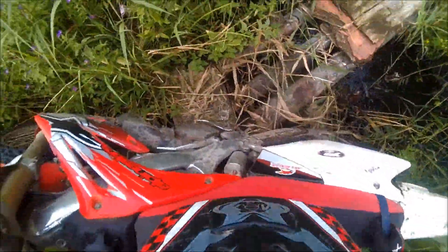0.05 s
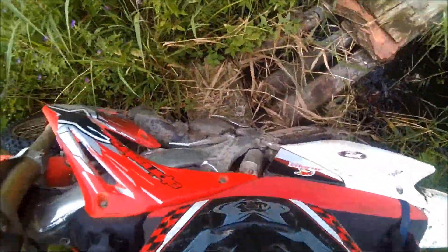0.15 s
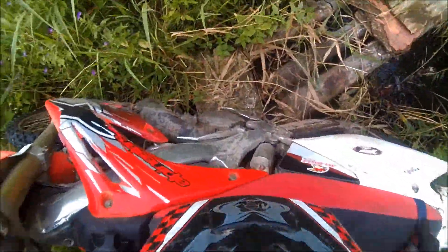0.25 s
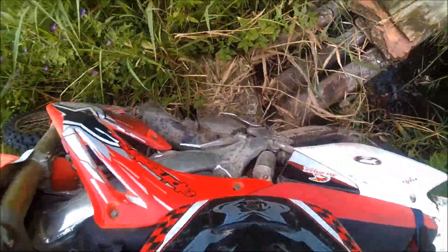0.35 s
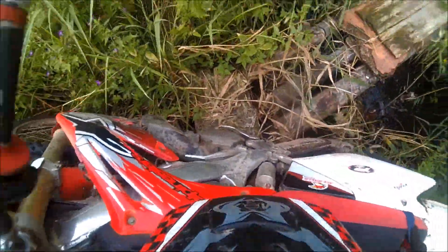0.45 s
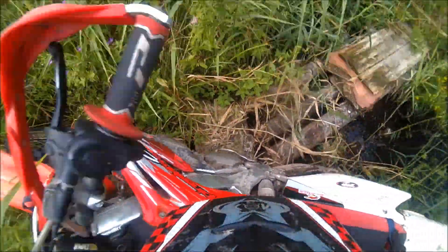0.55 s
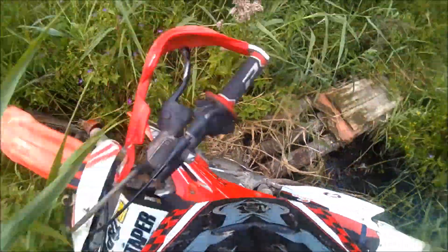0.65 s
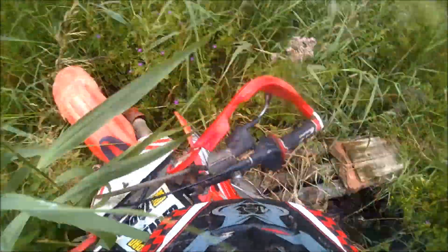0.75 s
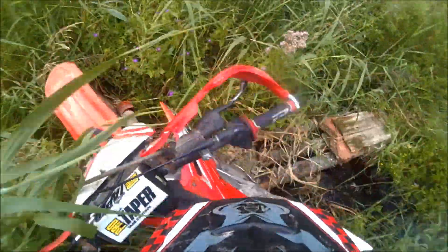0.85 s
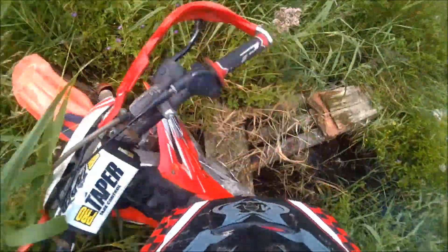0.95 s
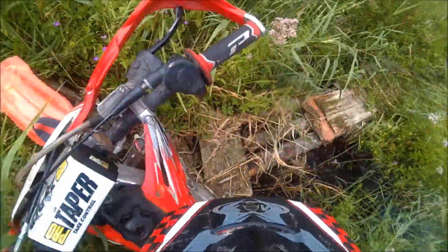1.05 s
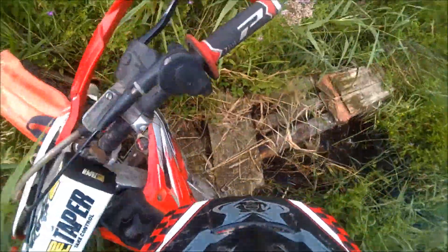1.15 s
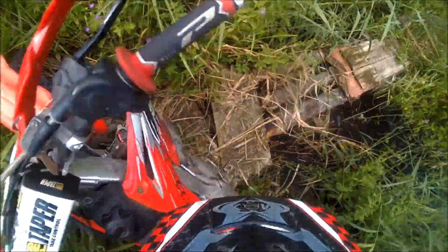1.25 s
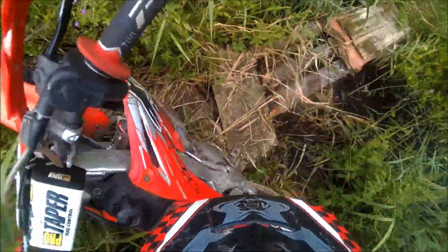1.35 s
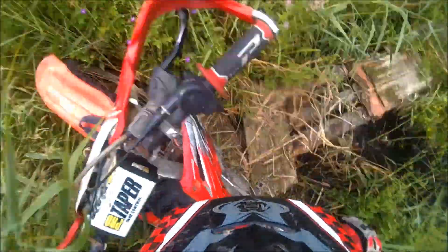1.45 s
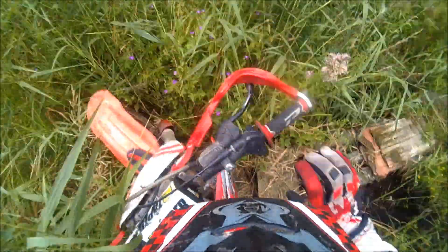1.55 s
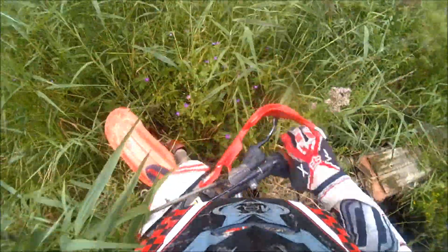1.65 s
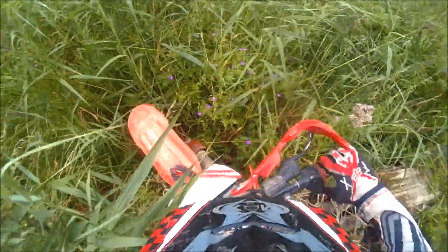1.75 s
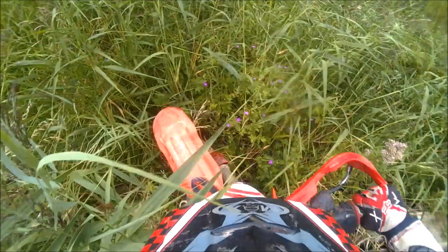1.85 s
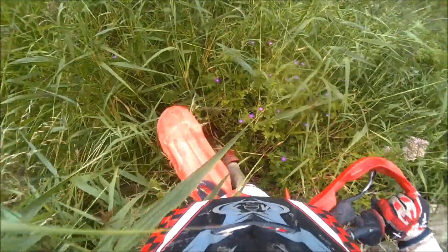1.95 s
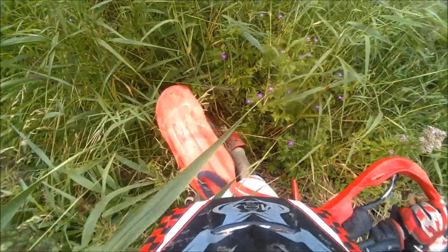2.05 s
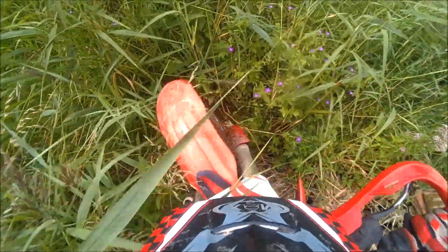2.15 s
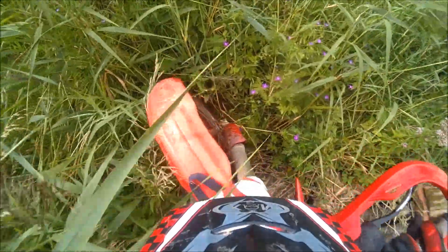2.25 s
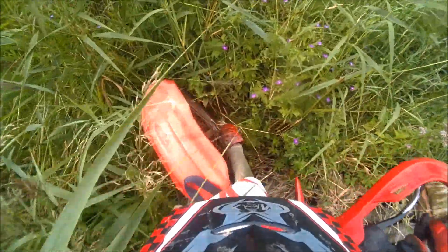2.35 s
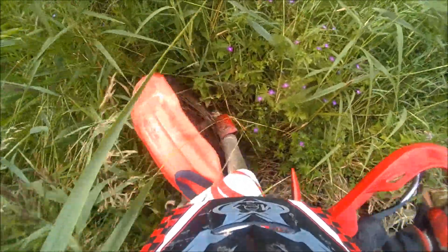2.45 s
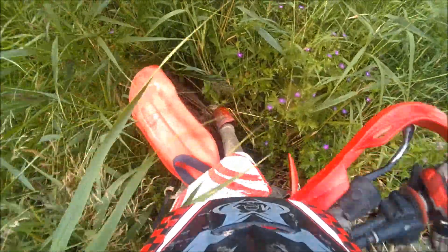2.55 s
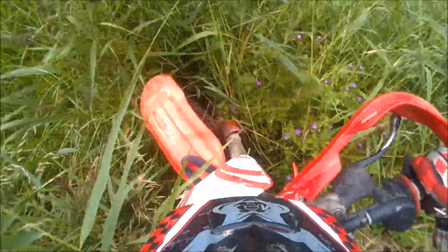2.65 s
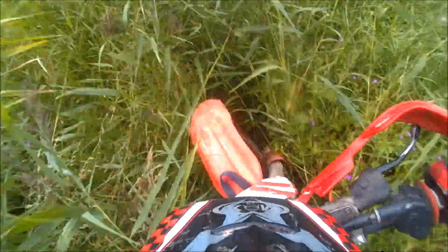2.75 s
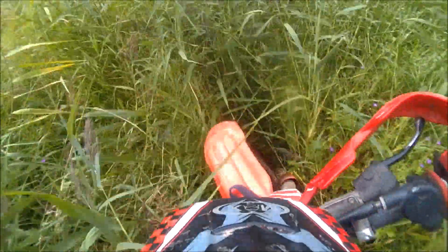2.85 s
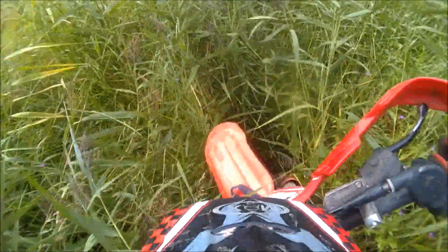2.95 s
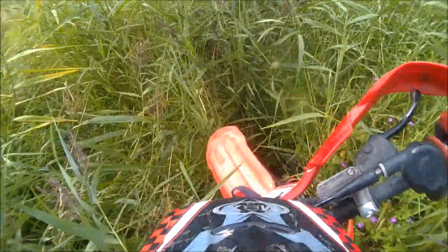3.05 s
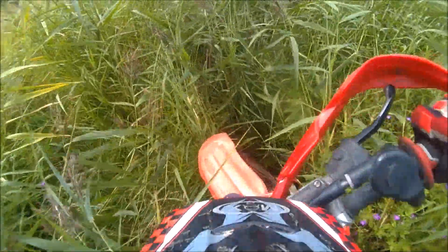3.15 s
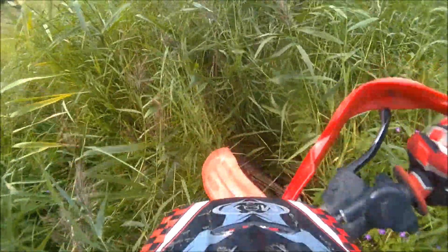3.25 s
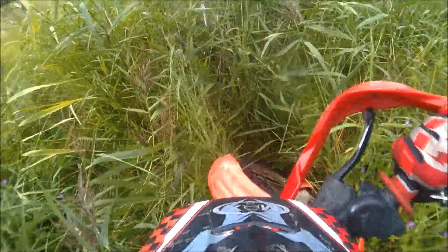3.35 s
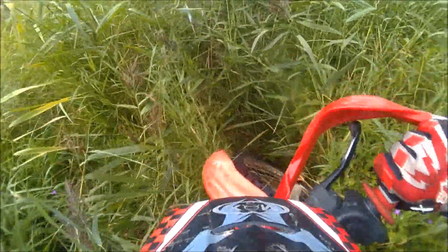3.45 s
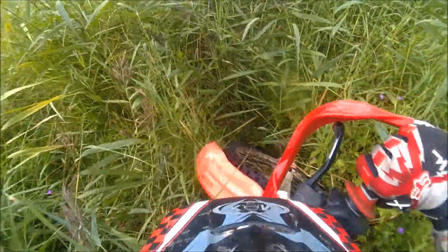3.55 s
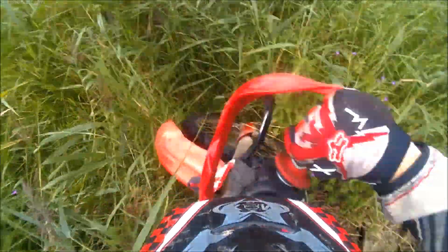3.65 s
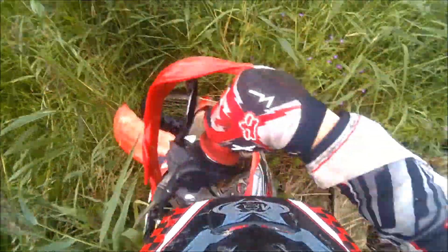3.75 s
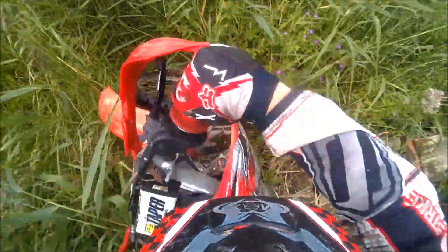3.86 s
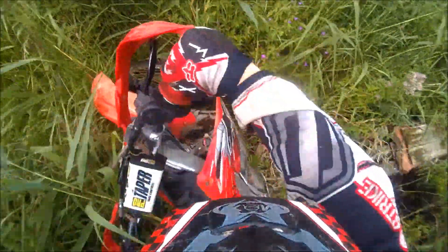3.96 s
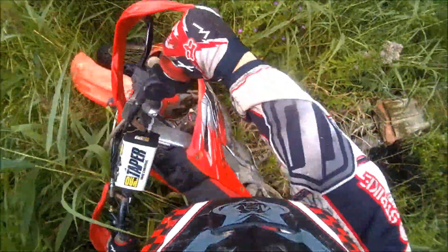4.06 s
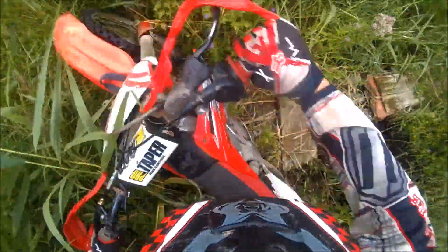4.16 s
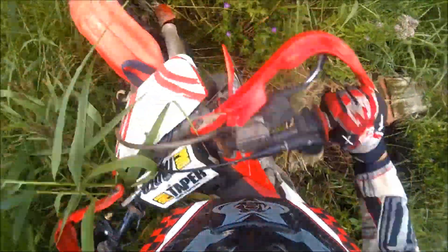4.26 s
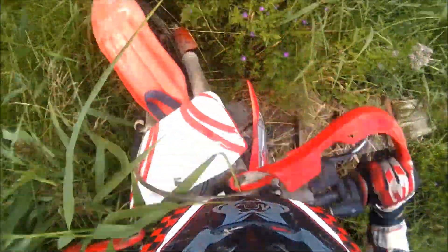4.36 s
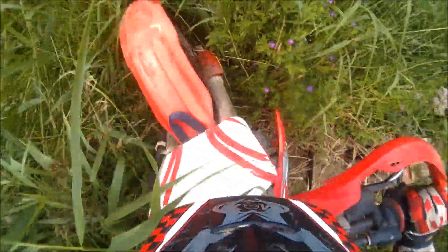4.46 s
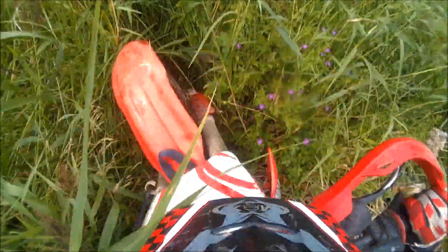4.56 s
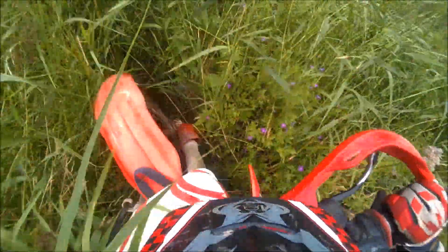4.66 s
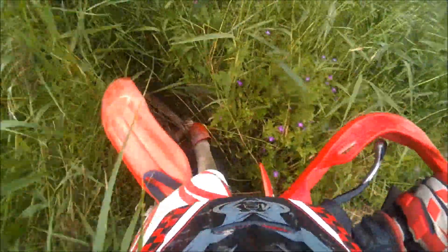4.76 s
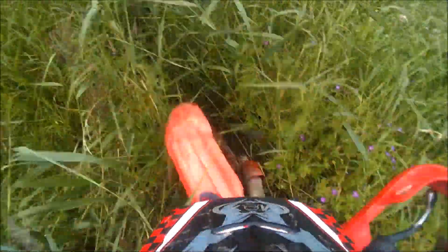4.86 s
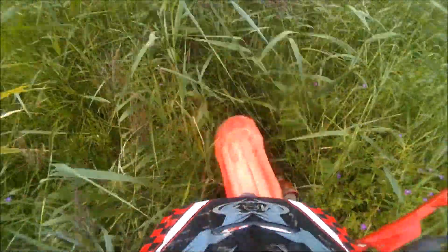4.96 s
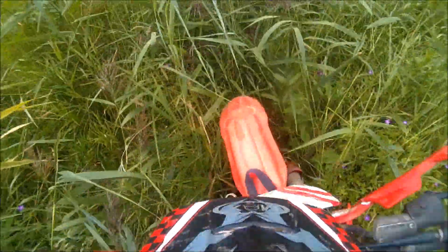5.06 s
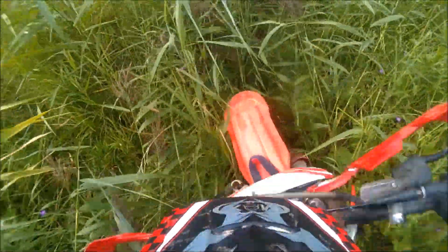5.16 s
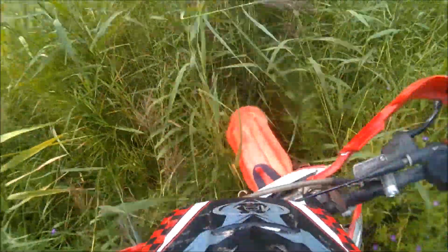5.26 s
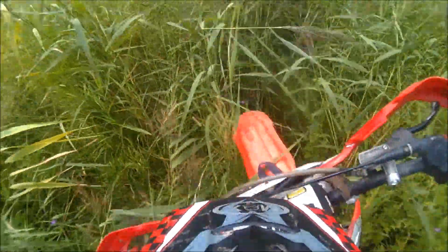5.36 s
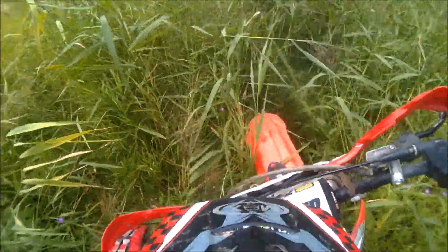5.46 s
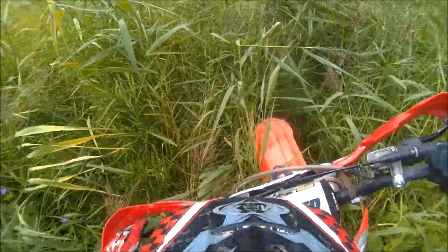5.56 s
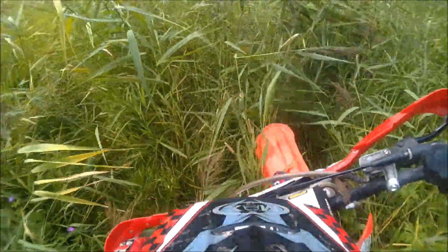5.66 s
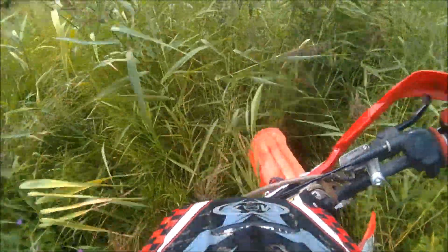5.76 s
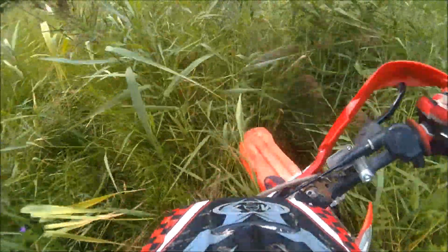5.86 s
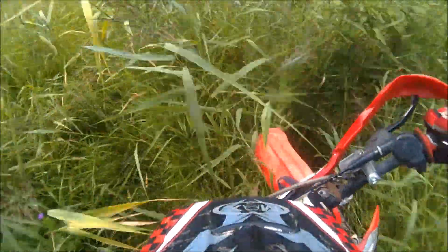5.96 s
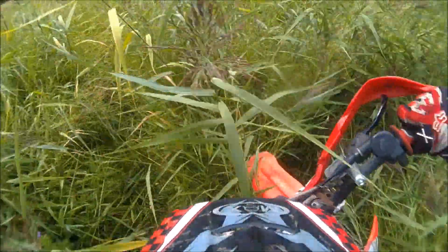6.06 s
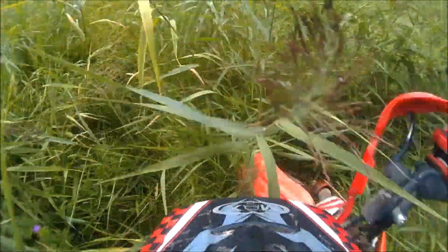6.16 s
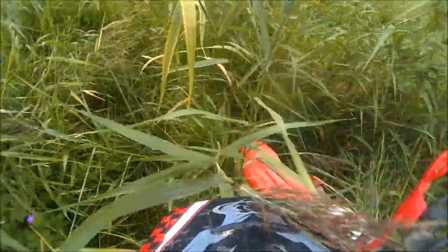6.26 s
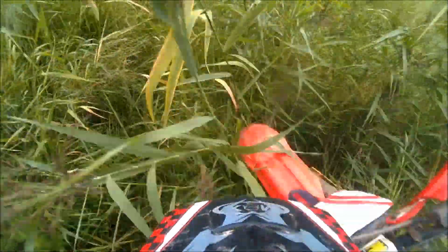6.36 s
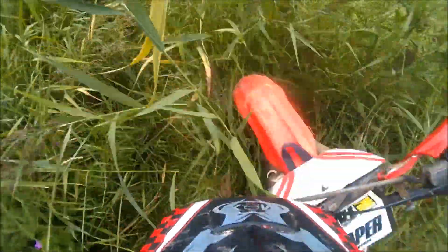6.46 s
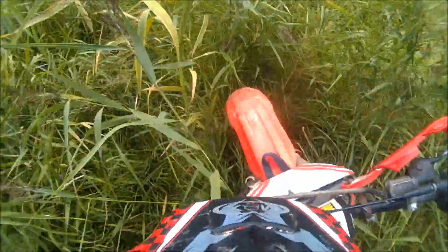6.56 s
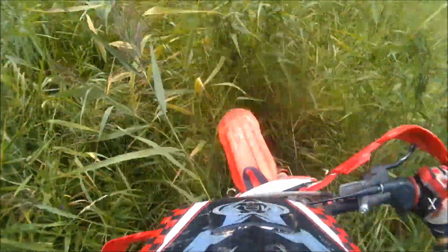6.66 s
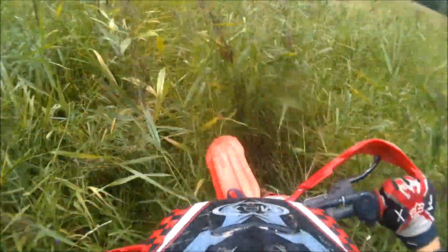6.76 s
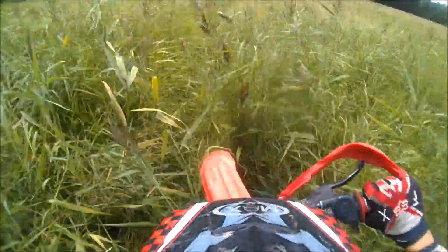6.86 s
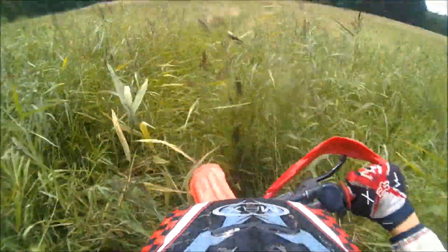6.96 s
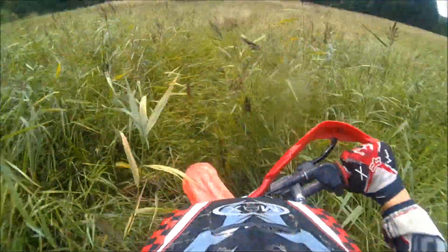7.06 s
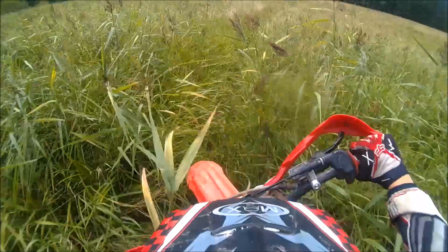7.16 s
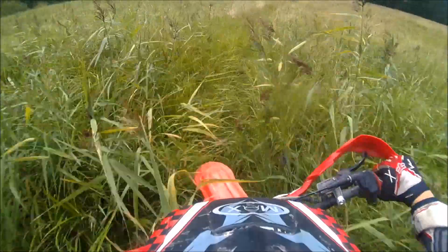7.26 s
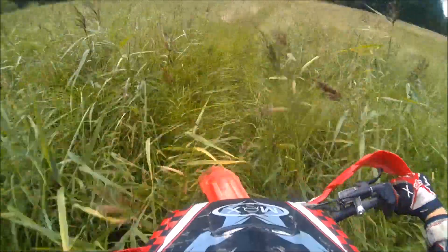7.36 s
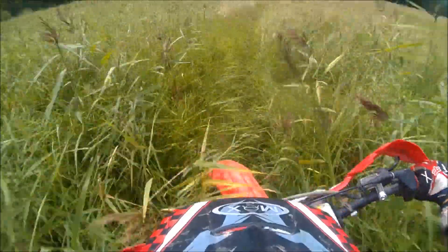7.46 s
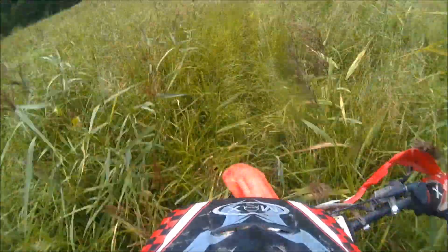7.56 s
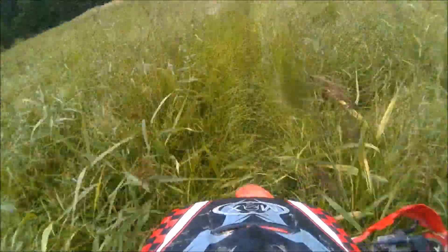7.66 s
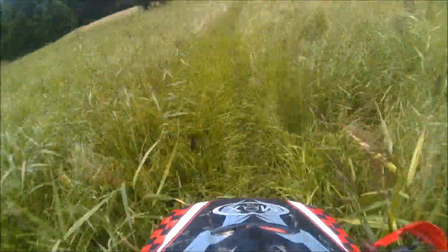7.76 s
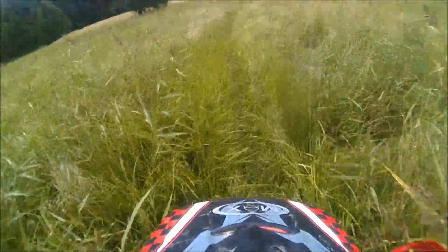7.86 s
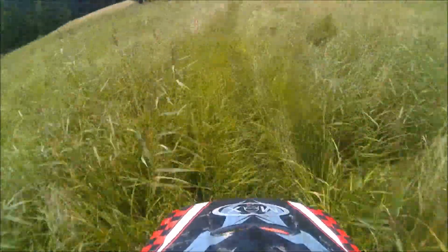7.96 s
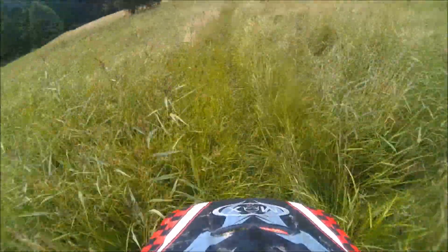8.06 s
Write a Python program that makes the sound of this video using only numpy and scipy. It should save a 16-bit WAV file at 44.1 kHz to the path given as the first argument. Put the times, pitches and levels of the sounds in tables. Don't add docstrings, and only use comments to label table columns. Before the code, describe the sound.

A small two-stroke dirt bike engine coasts low, then revs in raspy, uneven bursts and pulls through tall grass, heard through a muffled helmet microphone.

```python
import sys
import numpy as np
from scipy import signal
from scipy.fft import rfft, irfft
from scipy.io import wavfile
from scipy.ndimage import uniform_filter1d, minimum_filter1d

SR = 44100
rng = np.random.default_rng(int(sys.argv[2]) if len(sys.argv) > 2 else 0)


def generate_wav(signal):
    frames = np.transpose(np.atleast_2d(signal))
    scaled = np.clip(frames, -1, 1) * 32767
    pcm = np.round(scaled).astype(np.int16)
    wavfile.write(sys.argv[1], SR, pcm)


def invert_db(x):
    u = np.asarray(x, float) / 20
    return 10 ** u


N = 358088


def rms_one(x):
    return x / np.sqrt(np.mean(x ** 2) + 1e-20)


def in_time(rows):
    s, *columns = np.transpose(rows)
    return [np.interp(np.arange(N) / SR, s, c) for c in columns]


def at_hz(points, hz):
    table = np.array(points)
    return np.interp(np.log(hz), np.log(table[:, 0]), table[:, 1])


def band_of(x, low_hz, high_hz, order=2):
    return signal.sosfilt(signal.butter(order, [low_hz, high_hz], "band", fs=SR, output="sos"), x)


def drift(rate):
    r = np.exp(-80 * np.pi * rate / SR)
    slow = signal.lfilter([1], [1, -2 * r, r * r], rng.standard_normal(N // 40 + 2002))[2000:]
    return np.interp(np.arange(N) / 40, np.arange(len(slow)), rms_one(slow))


def through(x, spectrum, modes=()):
    size = 8192
    hz = np.maximum(np.arange(size // 2 + 1) * SR / size, 1)
    db = at_hz(spectrum, hz) + sum(g / (1 + (2 * (hz - f) / w) ** 2) for f, w, g in modes)
    cepstrum = irfft(np.log(invert_db(db)))
    cepstrum[1:size // 2] *= 2
    cepstrum[size // 2 + 1:] = 0
    response = irfft(np.exp(rfft(cepstrum)))
    return signal.fftconvolve(x, response / np.linalg.norm(response))[:N]


# f/Hz, level/dB (per Hz)
CASE = [(50, -31.5), (155, -28), (234, -18), (290, -19.5), (523, -14.5), (800, -14), (1300, -2), (1690, -6),
        (2300, -5), (3450, -15), (4080, -31), (4670, -38.5), (5400, -49), (6200, -77.5)]
# f/Hz, width/Hz, level/dB
CASE_MODES = [(1220, 430, 9), (1416, 39, 8.5), (1700, 140, -3.5), (1878, 38, 6), (1977, 84, 6.5),
              (2191, 267, -7), (2317, 80, 8.5), (2640, 58, 6), (3323, 440, -6), (4010, 200, -9.5),
              (4580, 340, 8.5)]


def through_case(x):
    return through(x, CASE, CASE_MODES)


# f/Hz, level/dB (per Hz)
LEAK = [(5000, -28), (5800, -12), (6200, -10), (6850, 1), (7600, -13.5), (8200, -33), (9000, -3),
        (9600, -1.5), (10500, 0.5), (11500, -6), (12700, -1.5), (14500, -10), (15800, -20.5)]


def past_seal(x):
    return through(x, LEAK)


# f/Hz, level/dB (per Hz)
SCRAPE_COLOUR = [(300, -6), (1300, -6), (2200, 2.5), (3000, 11), (4500, 9.5), (6000, 4.5)]


def brighten(x):
    return through(x, SCRAPE_COLOUR)


def bursts(seconds, levels_db, rise_s, fall_s):
    clicks = np.zeros(N)
    clicks[np.minimum((np.asarray(seconds) * SR).astype(int), N - 1)] = invert_db(np.asarray(levels_db))
    t = np.arange(SR // 5) / SR
    shape = np.exp(-t / fall_s) * (1 - np.exp(-t / rise_s))
    return signal.fftconvolve(clicks, shape / shape.max())[:N]


# multiple/1, level/dB
ORDER_PATTERN = [(1, 2), (2, 2), (3, -2), (4, 2), (5, 1), (6, 1), (7, 2), (8, -2), (10, -5), (12, 1),
                 (13, 0), (15, -2), (16, 3), (17, -2), (18, -2), (19, 3), (21, 2), (23, -1), (32, -3)]


def orders(turns, gain_db, swell_db, first, count):
    out = 0
    for k in range(first, first + count):
        gain = invert_db(gain_db(k) + at_hz(ORDER_PATTERN, k) + swell_db * drift(5)[::64])
        out = out + np.repeat(gain, 64)[:N] * np.sin(2 * np.pi * (k * turns + rng.random()))
    return out


# f/Hz, level/dB (per Hz)
HISS = [(5000, -17), (6300, 0), (8200, -9), (10400, 2), (13000, -0.5), (15800, -11.5)]
# f/Hz, level/dB (rms)
WHISTLES = [(14443, -102.5), (14530, -89), (14621, -94.5), (14707, -100)]


def electronics():
    t = np.arange(N) / SR
    sway = 0.8 * drift(8.0)
    whistle = sum(np.sqrt(2) * invert_db(db) * np.sin(2 * np.pi * hz * t + sway) for hz, db in WHISTLES)
    return invert_db(-86) * through(rng.standard_normal(N), HISS) + whistle


def rumble():
    noise = band_of(rng.standard_normal(N), 130, 800)
    return invert_db(-58.5 + 2.0 * drift(4.9)) * rms_one(noise)


# t/s, length/s, level/dB
BUZZES = [
    (1.58, 0.25, -85),
    (1.86, 0.11, -78),
    (7.103, 0.56, -85),
]


def grasshopper():
    t, strokes_per_s, centre_hz, width_hz = np.arange(N) / SR, 160, 10450, 500
    on = 0
    for s, length_s, db in BUZZES:
        on = on + invert_db(db) * np.clip(np.minimum(t - s, s + length_s - t) / .015, 0, 1)
    strokes = np.exp(-(t * strokes_per_s % 1) / .2) * rng.standard_normal(N)
    return on * rms_one(band_of(strokes, centre_hz - width_hz / 2, centre_hz + width_hz / 2))


# t/s, level/dB, fade/s
JOLTS = [(.11, -44.5, .08), (.36, -43, .08), (.57, -40, .15), (.79, -46.5, .15), (1.11, -44, 0.054),
         (1.25, -53, .1), (1.5, -51.5, 0.27), (1.679, -43, 0.066), (1.971, -45.5, .1), (2.24, -50, .04),
         (2.42, -42.5, 0.05), (2.6, -49, 0.14), (2.85, -44.5, 0.31), (3.42, -41.5, 0.056),
         (3.78, -56, 0.38), (4.35, -37.5, 0.19), (4.71, -46.5, 0.083), (5.0, -47.5, 0.067),
         (5.3, -54.5, 0.34), (5.95, -52, .2), (6.13, -45, .05), (6.261, -39, 0.046), (6.52, -43, .12),
         (6.78, -42, .15), (7.15, -39, 0.049), (7.23, -32.5, 0.11), (7.62, -44.5, .2), (8.06, -45.5, .2)]


def wobble():
    t, rise_s = np.arange(N) / SR, 0.037
    sway = np.cumsum(30 + 1.3 * drift(7.0)) / SR
    swing = invert_db(-68)
    for s, db, fade_s in JOLTS:
        late = np.maximum(t - s, 0)
        swing = swing + invert_db(db + 3.5) * np.exp(-late / fade_s) * (1 - np.exp(-late / rise_s))
    return np.sqrt(2) * swing * (1 + 0.3 * drift(8.3)) * np.sin(2 * np.pi * sway)


# t/s, peak/dB, ring/s, bass push/dB, leak/dB
KNOCKS = [
    (0.638, -7, 0.00069, -39, -46.5),
    (1.8842, -19.5, 0.00051, -67, -32),
    (7.226, 0, 0.00058, -16.5, -56),
    (7.225, -20.5, 0.0035, -48, -50.5),
]


def knocks():
    clicks, leaks, pushes = np.zeros(N), np.zeros(N), np.zeros(N)
    for s, peak_db, ring_s, push_db, leak_db in KNOCKS:
        click = bursts([s], [peak_db], rise_s=0.00014, fall_s=ring_s) * rng.standard_normal(N)
        clicks, leaks = clicks + click, leaks + invert_db(leak_db) * click
        pushes[int(s * SR)] = invert_db(push_db)
    clicks = clicks + invert_db(-8) * brighten(clicks)
    t = np.arange(SR // 2) / SR
    fade = lambda fade_s: np.exp(-t / fade_s)
    tone = lambda hz: np.sin(2 * np.pi * hz * t)
    swing = tone(30) * fade(0.08) * (1 - fade(.015))
    swing = swing + .2 * np.sin(2 * np.pi * 3 * (1 - fade(.012))) * fade(.012)
    swing = swing + 0.52 * tone(54) * fade(0.032) + 0.49 * tone(190) * fade(0.017) * (1 - fade(0.013))
    swing = swing + 0.54 * tone(510) * fade(0.0072) + 2.5 * tone(2200) * fade(0.0054)
    return through_case(clicks) + past_seal(leaks) + signal.fftconvolve(pushes, swing)[:N]


# t/s, level/dB, length/s, leak/dB
SCRAPES = [
    (0.591, -22, 0.02, -37.5),
    (0.606, -24.5, 0.023, -37),
    (0.623, -18.5, 0.011, -43),
    (0.632, -11.5, 0.014, -43),
    (0.679, -23.5, 0.026, -65),
    (0.709, -37, 0.0066, -56),
]


def scrape():
    t, slips, drag, leak = np.arange(N) / SR, rng.standard_normal(N), 0, 0
    for s, db, length_s, leak_db in SCRAPES:
        one = invert_db(db) * np.clip(3 * np.minimum(t - s, s + length_s - t) / length_s, 0, 1)
        drag, leak = drag + one, leak + invert_db(leak_db) * one
    return invert_db(2.5) * through_case(brighten(drag * slips)) + past_seal(leak * slips)


# t/s, length/s, crank speed reached/(turns/s), throttle/1
THROTTLE = [(1.87, .14, 67, 1), (2.01, .08, 71, .2), (2.09, .18, 118, 1), (2.27, .12, 98, .9),
            (2.39, .17, 104.6, .9), (2.56, .14, 96, .8), (2.70, .29, 119, .9), (3.17, .27, 112.4, .8),
            (4.24, .23, 107.5, 1), (4.47, .13, 102.2, .8), (4.60, .16, 124, .9), (4.76, .19, 116, .1),
            (5.12, .32, 106.2, .9), (5.44, .15, 102.5, .9), (5.59, .14, 106.2, .9), (5.73, .17, 102.5, .9),
            (5.90, .16, 108.5, .9), (6.06, .18, 77.4, .8), (6.24, .13, 83.5, .7), (6.37, .08, 84.4, .6),
            (6.45, .19, 96.2, .5), (6.64, .19, 94, .4), (6.83, .18, 76.5, .7), (7.01, .11, 75.5, .8),
            (7.61, .15, 58.4, .8), (7.76, .17, 51.4, .7), (7.93, .18, 45.6, .7)]


def crank():
    idle, sag_per_s = 31, .72
    t, speed, throttle = np.arange(N) / SR, np.zeros(N), np.zeros(N)
    now, since = 62.3, 0
    for s, length_s, goal, opening in THROTTLE + [(N / SR, 1, 0, 0)]:
        a, b, c = int(since * SR), int(s * SR), int((s + length_s) * SR)
        start = a
        if b > a + 1:
            sagging = now * np.exp(-sag_per_s * (t[a:b] - since))
            speed[a:b] = (sagging ** 6 + idle ** 6) ** (1 / 6)
            now, start = speed[b - 1], b
        speed[start:c] = now + (goal - now) * np.sin(np.pi / 2 * (t[start:c] - s) / length_s) ** 2
        throttle[b:c], now, since = opening, goal, s + length_s
    return speed, uniform_filter1d(throttle, size=SR // 20)


# t/s, nearness/dB, dullness/dB
HELMET = [(0, 2, 1.5), (.42, 1.5, -1), (.8, -0.5, 5.5), (1.6, -1.5, 1.5), (1.95, -1.5, -1), (2.2, 2, 0),
          (2.7, 0, -1), (3.0, 2.5, 3), (3.5, -0.5, -1.5), (4.2, -3.5, -2.5), (4.55, 2.5, -0.5), (5.1, 1, 1),
          (5.7, 1.5, 4), (6.25, 0, -0.5), (6.7, 1, 0.5), (7.1, -2.5, -1), (7.5, -1, 1), (8.12, -4.5, 4)]
# t/s, length/s, loss/dB
BOGS = [
    (2.019, 0.12, 6.5),
    (3.019, 0.12, 4),
    (4.582, 0.054, -1.5),
    (5, 0.066, 0),
    (6.185, 0.2, -0.5),
    (7.45, 0.26, 1),
]


def loudness(speed, throttle):
    near_db, dull_db = in_time(HELMET)
    t = np.arange(N) / SR
    for s, length_s, db in BOGS:
        near_db = near_db - db * np.sin(np.pi * np.clip((t - s) / length_s, 0, 1))
    octaves = np.log2(speed / 105)
    overrev = np.clip((speed - 108) / 10, 0, 1)
    effort_db = near_db + 0.66 * throttle + 0.5 * overrev
    low_db = -22 + 8.5 * octaves + effort_db + dull_db / 2
    high_db = -20.5 + 13.5 * octaves + effort_db - dull_db / 2
    orders_db = -33 + 7 * octaves + near_db + 2 * overrev + (1 - throttle)
    return low_db, high_db, orders_db


def boom(speed, throttle):
    centre_hz, width_hz = 230, 30
    noise = rng.standard_normal(N)
    for _ in range(2):
        noise = band_of(noise, centre_hz - width_hz / 2, centre_hz + width_hz / 2, order=1)
    labour = (throttle + 0.15) * np.clip((90 - speed) / 15, 0, 1)
    labour = labour + invert_db(9) * throttle * np.clip((speed - 92) / 10, 0, 1)
    return invert_db(-56) * labour * rms_one(noise)


def clatter(speed, turns):
    tick = np.exp(-(turns % 1) / 1.0) * np.clip((60 - speed) / 20, 0, 1) * rng.standard_normal(N)
    return invert_db(-31.5) * through_case(brighten(tick))


# t/s, length/s, teeth or multiple a crank turn/1, slip/(teeth or multiples/s), level/dB
WHINE = [(-.1, 0.63, 19.8, 5, -25.5), (-.1, 0.8, 18.7, 9.5, -28), (3.485, 0.067, 16.4, -3, -23.5),
         (4.45, 0.23, 20.2, 15, -12.5), (4.711, 0.53, 15.6, 1.8, -16), (6.565, 0.52, 19.3, 0, -19.5),
         (6.596, 0.35, 23, 3.5, -24), (2.22, 0.18, 18.4, 17.5, -11.5), (2.8, 0.22, 22, -8.5, -15),
         (2.97, 0.58, 12, -0.5, -17), (2.99, 0.28, 11, 0, -22.5), (3.3, 0.36, 20.4, 3, -18.5),
         (4.86, 0.096, 12, 1.5, -8), (4.865, 0.23, 17.7, 7.5, -16), (6.55, 0.27, 19, -0.5, -22),
         (6.3, 0.39, 32.6, -5, -25), (7.631, 0.43, 20.1, -14, -34), (7.66, 0.24, 19.2, -15.5, -34.5),
         (7.636, 0.34, 21.8, -17.5, -28)]
# t/s, length/s, multiple/1, slip/(multiples/s), level/dB
SWELLS = [(-.05, .4, 6, -1.5, -51), (-.05, 0.6, 7, 0, -51), (4.03, 0.32, 6, 1, -48.5),
          (2.75, .35, 2, 0, -39), (3, .45, 2, 0, -41.5), (3.5, .45, 4, 0, -39.5), (4.5, 0.71, 2, 0, -36),
          (6.5, 0.63, 7, 0, -39), (5, .25, 5, 0, -38.5), (3.0, 0.15, 13, 1, -26), (3.02, 0.22, 18, 0, -21),
          (3.75, 0.44, 14, -1, -32), (6.97, 0.37, 27, 5.5, -32.5), (7.0, 0.34, 31, 5, -30.5),
          (.15, 0.52, 9, 0, -52.5), (2.95, 0.32, 2, 0, -36.5), (2.954, 0.38, 4, 0.5, -36.5),
          (2.99, .22, 7, 1.5, -35.5), (3.519, 0.14, 19, 4.5, -23.5), (4, 0.54, 5, 0, -48),
          (3.5, 0.16, 10, 0.5, -34), (5.5, 0.24, 13, 0.5, -15.5), (5.302, .3, 18.6, -0.5, -22),
          (6.416, 0.87, 12, 0.5, -27.5), (6.5, 0.59, 3, 0, -47), (7, .22, 3, 0.5, -48),
          (7, 0.22, 7, 1, -43), (8, 0.17, 17, 8, -39)]


def whine(speed, throttle):
    out, flutter, waver = np.zeros(N), drift(28), drift(60)
    for k, (s, length_s, teeth, slip, level_db) in enumerate(WHINE + SWELLS):
        at = np.arange(max(int(s * SR), 0), min(int((s + length_s) * SR), N))
        own = np.abs((at + k * SR // 2) % (2 * N - 2) - N + 1)
        along = (at / SR - s) / length_s
        shape = np.clip(np.minimum(along / 0.075, (1 - along) / 0.58), 0, 1) ** 2
        waver_hz = (teeth / 20) ** 2 * (8 + 22 * throttle[at] + 12 * (speed[at] < 65))
        hz = speed[at] * (teeth + slip * length_s * along) + waver_hz * waver[own]
        out[at] += shape * invert_db(level_db + 1.4 * flutter[own]) * np.sin(2 * np.pi * np.cumsum(hz) / SR)
    return out


COAST_REPEAT, LOAD_REPEAT = .65, .16
# f/Hz, level/dB
ORDER_COLOUR = [(40, -30), (115, -18.5), (190, -15), (215, -8), (238, 0), (290, -4), (400, -7.5), (470, 0),
                (525, 3.5), (590, -6), (665, 4.5), (740, -8.5), (830, 0.5), (1000, -3)]
# f/Hz, level/dB
COAST_COLOUR = [(250, -14.5), (340, -12), (395, 6), (460, -7), (540, -4.5), (640, -3), (720, 0.5),
                (1000, 0)]


def crank_orders(speed, turns, level_db, alike):
    idle_db = -10 * np.clip((46 - speed) / 8, 0, 1)
    slow_speed, coasting = speed[::64], alike[::64] / COAST_REPEAT
    dull_db = 11 * np.clip((85 - slow_speed) / 20, 0, 1)

    def colour_db(k):
        hz = k * slow_speed
        coast_db = at_hz(COAST_COLOUR, hz) * coasting * (k > 2)
        slow_db = dull_db / (1 + (450 / hz) ** 10) / (1 + (hz / 750) ** 10)
        return at_hz(ORDER_COLOUR, hz) - 60 * (hz > 1000) + coast_db - slow_db

    waver_db = 3.4 - 3.5 * alike[::64]
    return invert_db(level_db + idle_db - 10.5) * orders(turns, colour_db, waver_db, first=1, count=14)


# t/s, peak/dB, crackle above 8 kHz/dB
BANGS = [(2.245, -5, -55.5), (2.263, 8, -43), (2.284, 8.5, -40), (2.3, 8.5, -49), (2.316, -2, -45),
         (2.792, -7.5, -66.5), (2.821, -4.5, -47.5), (2.853, 2, -47.5), (2.888, 1.5, -48),
         (2.925, 4, -42.5), (2.956, 13, -35.5), (3.181, 5, -47), (3.236, -1.5, -48), (3.279, -4.5, -49),
         (3.309, -6.5, -70), (3.349, -7.5, -49.5), (3.364, 1.5, -48), (3.406, -6.5, -59.5),
         (3.446, -6, -49.5), (3.480, 0, -52), (4.448, -14.5, -61), (4.476, -5, -50), (4.511, -2, -48.5),
         (4.545, -5, -58.5), (4.683, -15.5, -51.5), (4.721, 4.5, -46), (4.758, -1, -47.5),
         (4.877, 12, -30.5), (4.994, 1, -46.5), (6.826, -6, -71)]
# t/s, peak/dB, crackle above 8 kHz/dB
IDLE_BANGS = [(0.144, -39, -78), (0.181, -22, -69), (0.321, -21.5, -66.5), (0.788, -32, -69),
              (0.921, -25, -66), (0.955, -19.5, -67), (1.118, -20, -81), (1.243, -18, -78.5),
              (1.354, -26, -68), (1.453, -29, -72), (1.591, -24.5, -72.5), (1.771, -24.5, -76),
              (1.915, -21, -73.5), (3.53, -8.5, -77.5), (3.667, -13.5, -72), (4.242, -12.5, -67.5),
              (7.428, -38, -76.5), (7.684, -20, -77), (7.741, -14.5, -68), (7.796, -18, -67),
              (7.845, -30, -75), (7.966, -27.5, -66.5), (8.094, -18, -58.5)]
# t/s, peak/dB, crackle above 8 kHz/dB
PULL_BANGS = [(2.375, -12.5, -60.5), (2.3912, -8, -60.5), (2.4246, -10, -65.5), (2.481, -5.5, -68.5),
              (2.5868, -4.5, -66), (2.7216, -7, -69), (2.737, -19, -69.5), (2.4344, -10, -65.5),
              (2.466, -8, -60.5), (2.5211, -7.5, -66), (2.5417, -5, -64.5), (2.5778, -7, -66),
              (2.6296, -5.5, -65), (2.68, -7, -69.5), (2.712, -7, -66), (2.7628, -6.5, -68),
              (2.7891, -1.5, -67.5),
              (5.0957, -6, -55), (5.1548, -9.5, -68.5), (5.2374, -12, -69.5), (5.1842, -7.5, -63),
               (5.251, -9, -61), (5.3075, -5.5, -59.5), (5.3477, -13.5, -65), (5.402, -3, -58),
               (5.4482, -7, -63), (5.5262, -4.5, -64.5), (5.5662, -4, -57), (5.633, -6.5, -63.5),
               (5.65, -7, -58), (5.73, -5, -59), (5.7648, -6.5, -65.5), (5.7966, -4, -60.5),
               (5.834, -7.5, -63.5), (5.8823, -6.5, -63.5), (5.913, -5, -59), (5.9873, -6.5, -62),
               (6.0205, -9, -62.5), (6.0675, -7.5, -63.5), (6.083, -11.5, -68), (6.1102, -5.5, -65),
               (6.1333, -5.5, -64.5), (6.1548, -5, -70.5), (6.2386, -10.5, -76), (6.2908, -12, -68),
               (6.3291, -12, -84), (6.3823, -11.5, -68.5), (6.4152, -10, -72), (6.4533, -10.5, -73),
               (6.5, -10, -71), (6.532, -5.5, -73.5), (6.596, -12.5, -67.5), (6.688, -9.5, -70.5)]


def firings(turns, throttle, high_db):
    pulling = np.array(PULL_BANGS) + [0, 0, 2]
    listed = np.r_[np.array(BANGS + IDLE_BANGS), pulling]
    at = np.searchsorted(turns, np.cumsum(rng.integers(2, 6, 250)))
    chance = rng.standard_normal((250, 2))
    peak_db = high_db[at % N] + 9.5 + chance[:, 0]
    rows = np.c_[at / SR, peak_db, peak_db - 54.5 + 6.5 * chance[:, 1]]
    free = np.abs(at[:, None] / SR - listed[:, 0]).min(axis=1) > .055
    return np.r_[listed, rows[(at < N) & free & (throttle[at % N] > .35)]]


def crackle(high_db, fired):
    s, _, crackle_db = fired.T
    grain_db = 3.5 * np.repeat(rng.exponential(1, N // 40 + 1).clip(0, 5.5), 40)[:N]
    gate = rms_one(invert_db(grain_db)) * bursts(s, crackle_db - 13.5, rise_s=0.0055, fall_s=0.01)
    gate = gate + invert_db(high_db - 54.5) + bursts(s, crackle_db - 3, rise_s=.0002, fall_s=.001)
    return past_seal(gate * rng.standard_normal(N))


# f/Hz, level/dB
IDLE_BASS = [(150, -8), (210, 9.5), (280, -10.5), (370, 3.5), (470, -9), (620, -0.5), (800, -2)]


def rasp(speed, turns, low_db, high_db, alike, fired):
    bass_hz, split_hz = 820, 2063
    idling, phase = np.clip((55 - speed) / 15, 0, 1), turns % 1
    uneven_db = 1.2 + .5 * idling + 1.2 * (1 - idling) * (1 - alike / COAST_REPEAT)
    uneven = invert_db(uneven_db * rng.standard_normal(1000)[turns.astype(int)])
    uneven = uneven * (1 - .38 * idling * np.cos(2 * np.pi * phase ** .7))
    puff = rms_one(uneven * (2.0 + 0.36 * np.exp(-phase / 0.022) * (1 - np.exp(-phase / 0.049))))
    s, peak_db, _ = fired.T
    bang = bursts(s, peak_db - 10, rise_s=.0015, fall_s=.0085)
    bang = bang + bursts(s, peak_db - 15, rise_s=.0003, fall_s=.002)
    crack = bursts(s, peak_db - 4.5, rise_s=.00002, fall_s=.00007)
    comb = np.sqrt(4 * speed / SR) * orders(turns, lambda k: 0, 2.5, first=10, count=23)
    noise = rng.standard_normal((3, N))
    reference = through_case(noise[2])
    low_edge = signal.butter(3, [bass_hz, split_hz], "band", fs=SR, output="sos")
    high_edge = signal.butter(4, split_hz, "high", fs=SR, output="sos")
    out = 0
    for edge, level_db, bang_db, share in ((low_edge, low_db, -1.5, alike * 0.79),
                                           (high_edge, high_db, -2.5, alike * 0.63)):
        steady = invert_db(level_db) * (np.sqrt(1 - share) * puff * noise[0] + np.sqrt(share) * comb)
        part = signal.sosfilt(edge, steady + invert_db(bang_db) * (bang * noise[1] + crack))
        out = out + part / np.std(signal.sosfilt(edge, reference))
    bass_db = low_db - 1 + 7 * np.clip((75 - speed) / 20, 0, 1)
    bass = invert_db(bass_db) * (1 - alike) ** 3 * puff * noise[2] + bang * noise[1]
    slow = np.clip((70 - speed) / 15, 0, 1)
    bass = (1 - slow) * bass + slow * through(bass, IDLE_BASS)
    return through_case(out + band_of(bass, 170, bass_hz))


def scene():
    speed, throttle = crank()
    low_db, high_db, orders_db = loudness(speed, throttle)
    coasting = (1 - throttle) * np.clip((speed - 36) / 22, 0, 1) * np.clip((135 - speed) / 35, 0, 1)
    alike = LOAD_REPEAT + (COAST_REPEAT - LOAD_REPEAT) * coasting
    turns = np.cumsum(speed * (1 + .002 * drift(15))) / SR
    shaky_turns = turns + .028 * throttle * drift(25)
    fired = firings(turns, throttle, high_db)
    surroundings = rumble() + grasshopper() + wobble() + knocks() + scrape()
    engine = boom(speed, throttle) + clatter(speed, turns) + whine(speed, throttle)
    engine = engine + crank_orders(speed, shaky_turns, orders_db, alike)
    engine = engine + crackle(high_db, fired) + rasp(speed, turns, low_db, high_db, alike, fired)
    return (surroundings + engine)[None]


def band_limit(x):
    return signal.sosfilt(signal.butter(12, 15830, fs=SR, output="sos"), x)


def record(dry):
    thump = band_of(np.clip(np.abs(dry) - .45, 0, 1) ** 2, 45, 350)
    x = dry + invert_db(-16.0) * thump
    over = np.maximum(np.abs(x) / .92, 1)
    hold = minimum_filter1d(1 / over, size=193)
    hold = uniform_filter1d(uniform_filter1d(hold, size=97), size=97)
    return band_limit(x * hold + electronics())


dry = scene()
out = record(dry)
generate_wav(out)
```